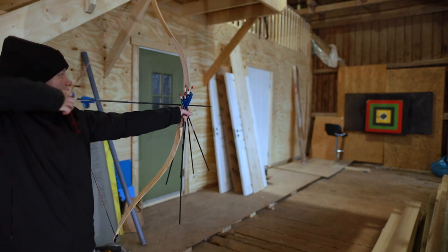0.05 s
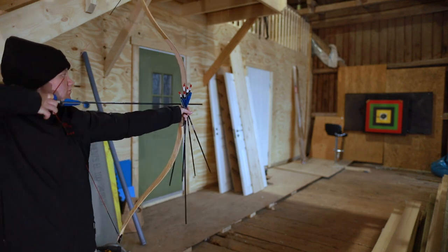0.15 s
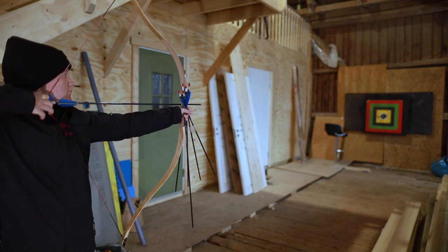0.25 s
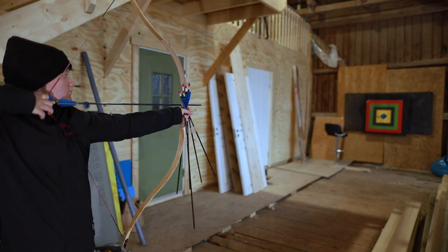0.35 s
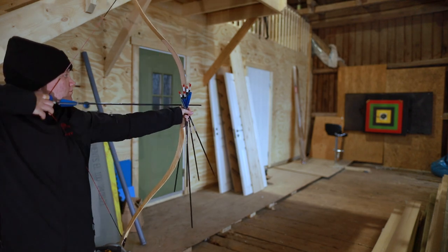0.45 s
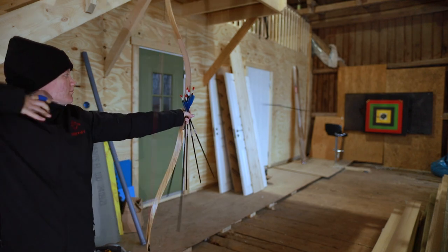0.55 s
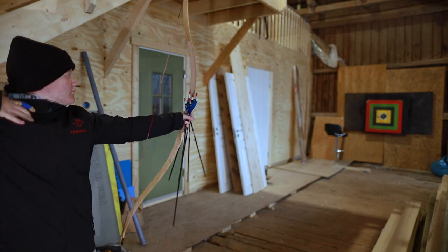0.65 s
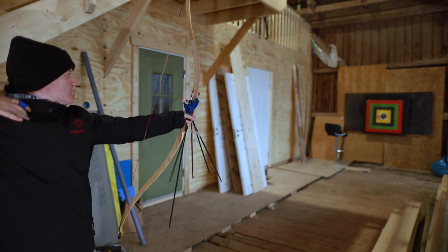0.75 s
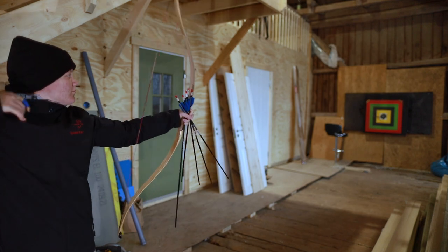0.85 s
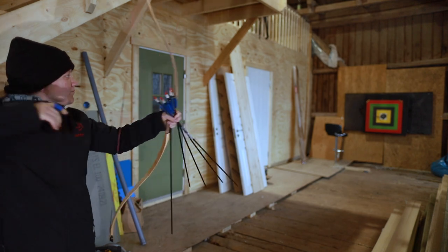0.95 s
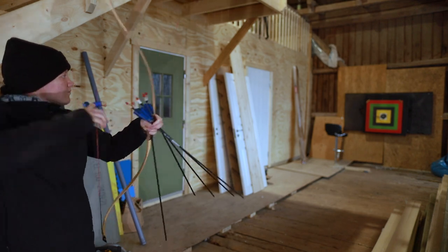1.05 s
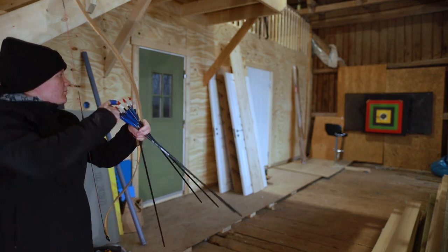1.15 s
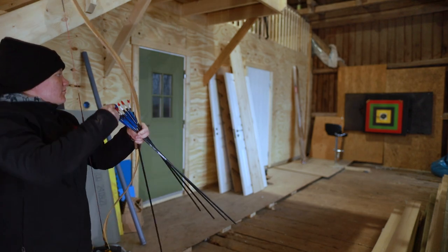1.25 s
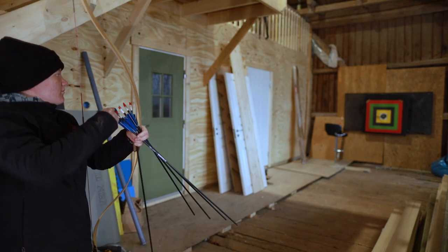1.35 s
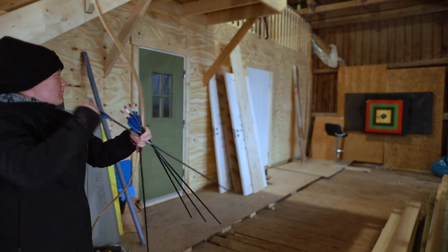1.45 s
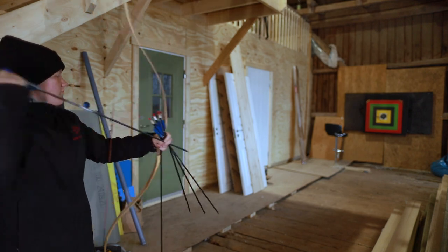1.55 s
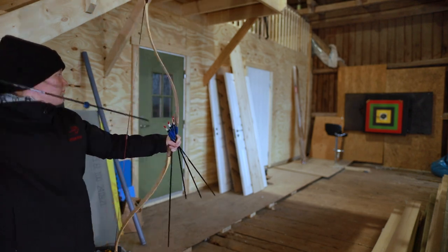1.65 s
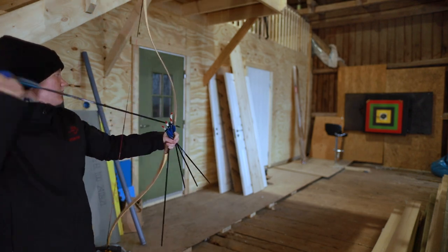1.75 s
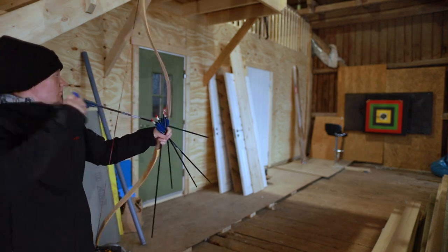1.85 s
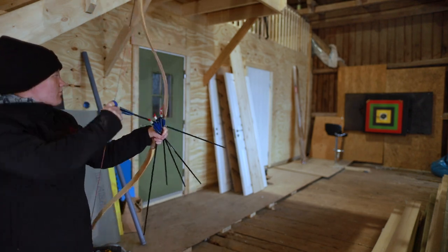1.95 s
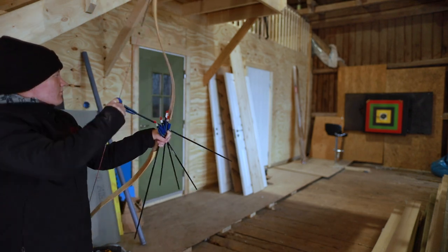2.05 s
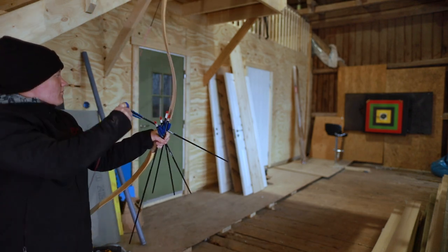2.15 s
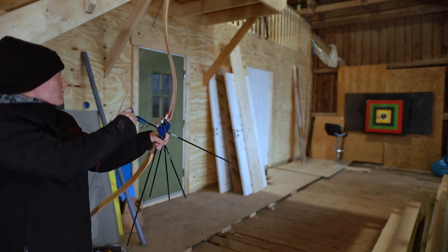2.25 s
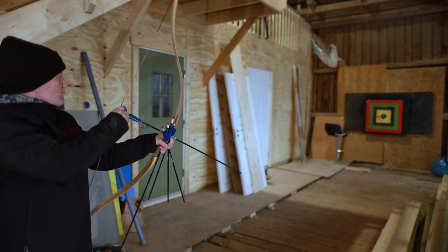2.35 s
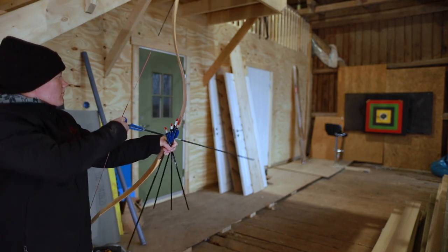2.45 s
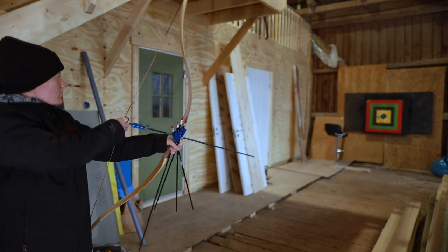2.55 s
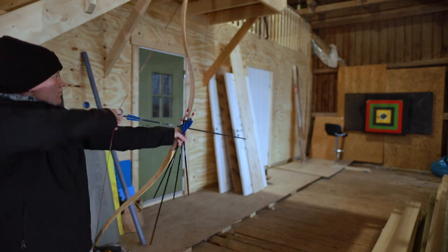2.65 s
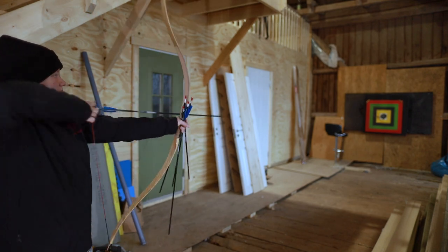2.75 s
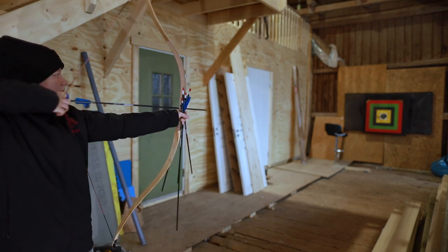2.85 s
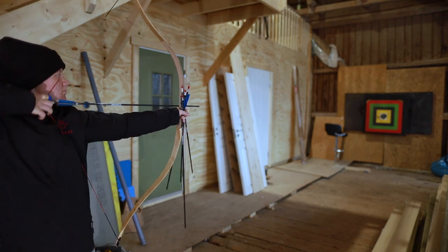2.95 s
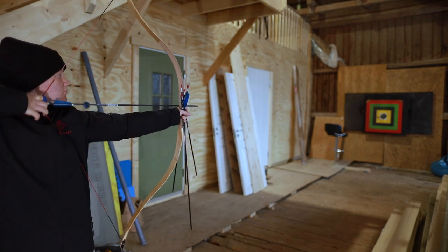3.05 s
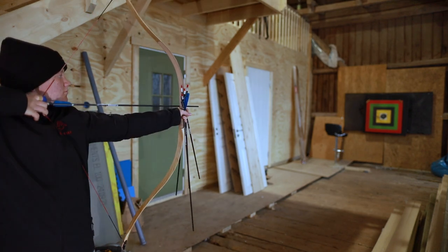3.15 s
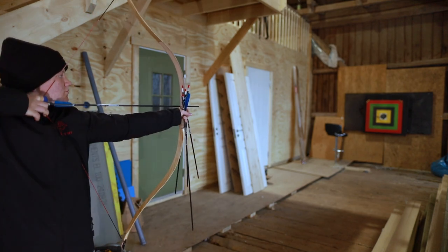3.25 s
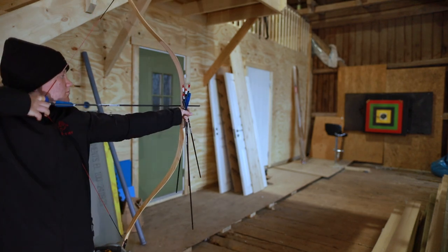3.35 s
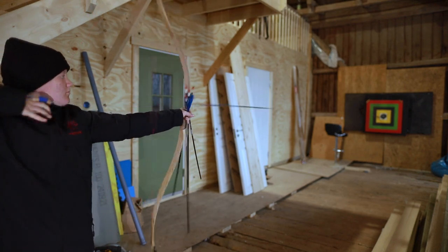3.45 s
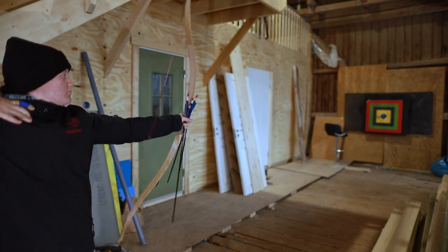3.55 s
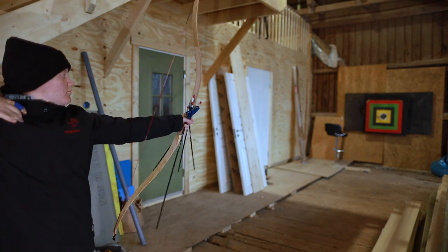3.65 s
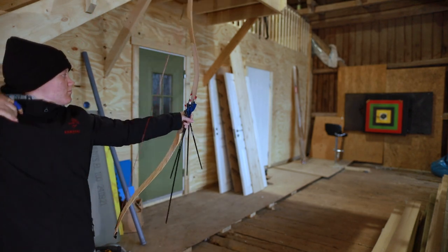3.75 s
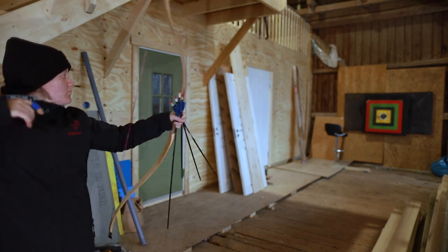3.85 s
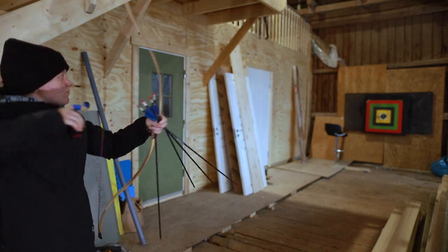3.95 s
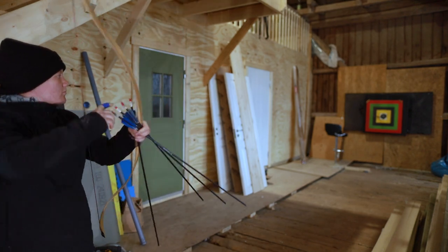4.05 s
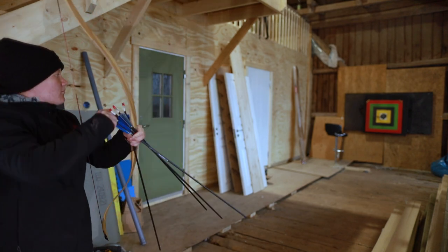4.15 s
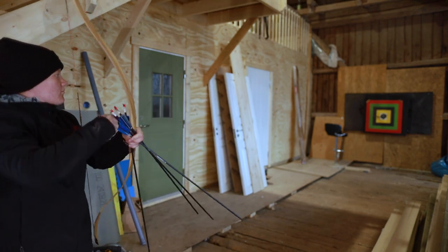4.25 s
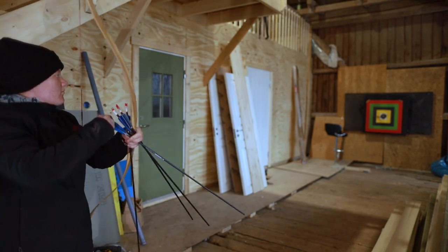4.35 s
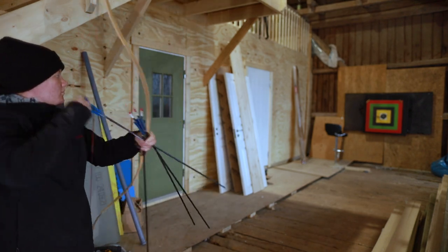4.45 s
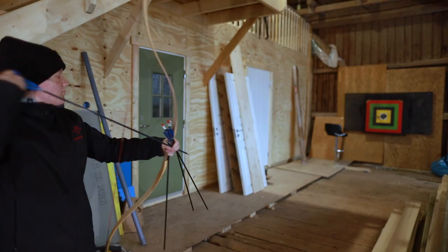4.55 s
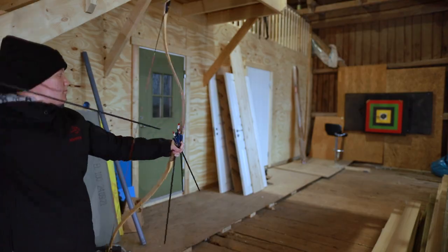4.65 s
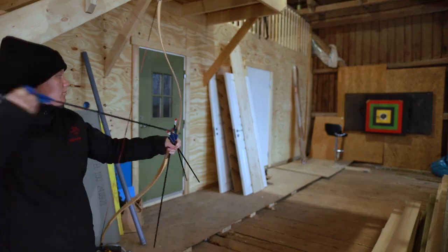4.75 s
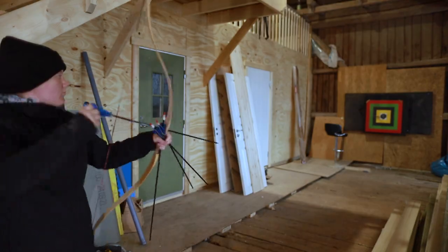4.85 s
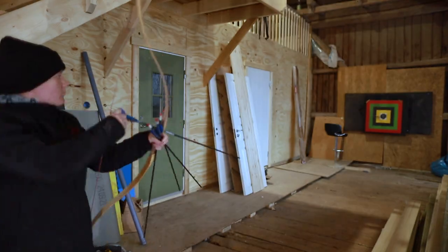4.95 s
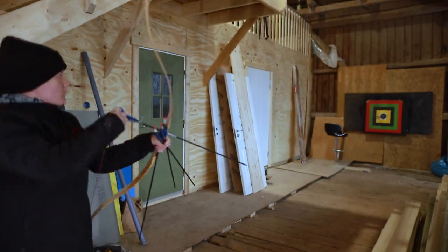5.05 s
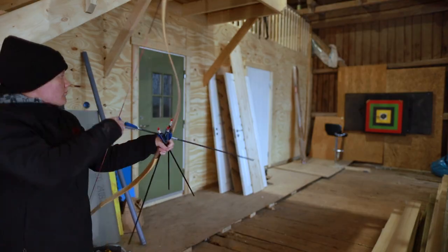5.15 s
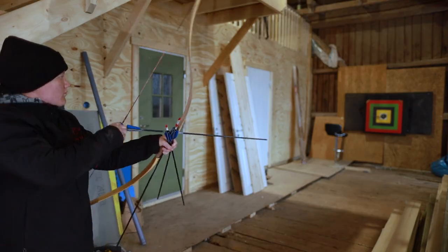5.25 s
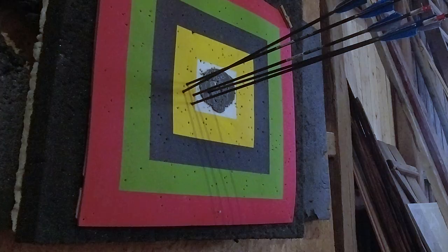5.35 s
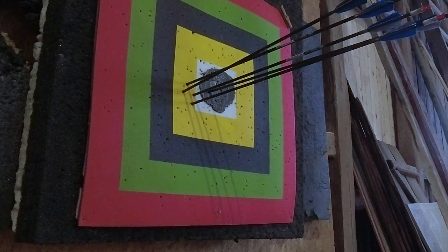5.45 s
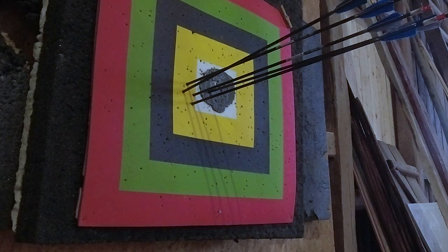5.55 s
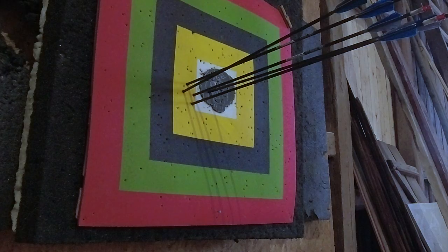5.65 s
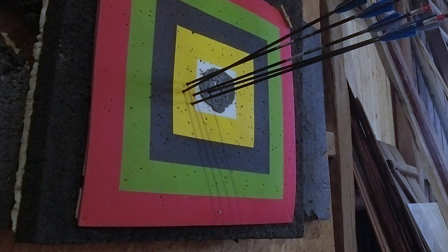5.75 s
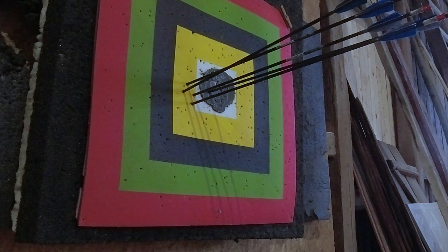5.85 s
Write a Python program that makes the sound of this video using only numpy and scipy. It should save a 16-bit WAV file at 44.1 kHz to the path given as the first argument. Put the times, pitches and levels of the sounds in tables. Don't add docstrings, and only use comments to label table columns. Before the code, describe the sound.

An archer looses an arrow, it cracks into a foam target and the barn rings; quiet reloading clicks, then a second shot.

```python
import sys
import numpy as np
from scipy import signal
from scipy.fft import rfft, irfft
from scipy.io import wavfile

SR = 44100
rng = np.random.default_rng(int(sys.argv[2]) if len(sys.argv) > 2 else 0)


def undo_db(level):
    steps = np.asarray(level, float) / 20
    return 10 ** steps


def unload_wav(signal):
    wavfile.write(
        sys.argv[1],
        SR,
        np.round(np.clip(np.atleast_2d(signal).T, -1, 1) * 32767).astype(np.int16),
    )


N = 260190

# time in seconds, peak in dB, backing-board hum in dB.
HITS = [
    (.7908, -.5, -85),
    (3.7108, -.5, -50),
]
# frequency in Hz, density in dB per Hz.
FOLD_COLOUR = [(47, -61.5), (80, -20), (479, -2.5), (555, -6), (853, -2.5), (1500, -7), (1950, -30),
               (3300, -120)]
# frequency in Hz, density in dB per Hz.
SCUFF_COLOUR = [(880, -27), (1500, -11), (2080, -8.5), (3050, -3), (4200, -1.5), (5000, -16), (6500, -40),
                (11000, -120)]


def rms_one(x):
    return x / np.sqrt(np.mean(x ** 2) + 1e-20)


def peak_one(x):
    return x / (np.max(np.abs(x)) + 1e-20)


def at_hz(points, hz, column=1):
    points = np.array(points)
    return np.interp(np.log(hz), np.log(points[:, 0]), points[:, column])


def add(out, s, piece):
    i = max(round(s * SR), 0)
    out[i:i + len(piece)] += piece[:N - i]


def resonance(x, hz, width_hz):
    r = np.exp(-np.pi * width_hz / SR)
    zeros = np.array([1, 0, -1]) * (1 - r * r) / 2
    return signal.lfilter(zeros, [1, -2 * r * np.cos(2 * np.pi * hz / SR), r * r], x)


def ring(clicks, hz, t60):
    r, w = undo_db(-60 / (t60 * SR)), 2 * np.pi * hz / SR
    return signal.lfilter([0, np.sin(w)], [1, -2 * r * np.cos(w), r * r], clicks + 1e-18)


def band(x, low_hz, high_hz):
    edges = [low_hz, min(high_hz, .45 * SR)]
    return signal.sosfilt(signal.butter(2, edges, "band", fs=SR, output="sos"), x)


def drift(rate_hz):
    r = np.exp(-2 * np.pi * rate_hz / SR)
    return rms_one(signal.lfilter([1], [1, -2 * r, r * r], rng.standard_normal(N + SR))[SR:])


def coloured(spectrum, grain_db, size=N):
    grains = rng.standard_normal(size) * undo_db(grain_db * np.minimum(rng.exponential(1, size), 5))
    hz = np.fft.rfftfreq(size, 1 / SR) + 1
    return rms_one(irfft(rfft(grains) * undo_db(at_hz(spectrum, hz)), size))


def knocks(rows, ring_width_hz, port_db, broad_db, grit):
    out, t = np.zeros(N), np.arange(2048) / SR
    roughness = rng.standard_normal((len(rows), 2048))
    for (s, db, hz, body_db, snap_db, contact_s), noise in zip(rows, roughness):
        burst = grit * noise * np.exp(-t / np.clip(contact_s, 2e-4, .02))
        burst[0] = -1
        port = resonance(burst, 3750, 750)
        shaft = resonance(burst, hz, ring_width_hz) + undo_db(port_db) * port
        shaft = band(shaft + undo_db(broad_db) * burst, 1200, 4600)
        body = band(band(burst, 550, 1700), 400, 3000)
        top_hz = np.interp(snap_db - db, [-16, -4], [7000, 16000])
        snap = band(burst * np.exp(-t / 0.0018), 3200, top_hz)
        piece = undo_db(db) * peak_one(shaft) + undo_db(body_db) * peak_one(body) + undo_db(snap_db) * peak_one(snap)
        add(out, s - .0001, piece)
    return out


def bowstring():
    # thump time in seconds, swish in dB, thump in dB, thump in Hz, flutter in dB.
    releases = [
        (0.6081, -31, -23, 516.4, -26.5),
        (3.531, -31, -15.5, 538, -25),
    ]
    # frequency in Hz, density in dB per Hz.
    swish_colour = [(88, -50), (170, -28), (439, -2), (900, -7.5), (2650, 0), (4320, -2), (5790, -5.5),
                    (16000, -18.5)]
    # time in seconds, peak in dB, ring in Hz, body and snap in dB over peak.
    slaps = [(0.6067, -22.5, 3370, 0, 0), (0.6162, -2.5, 3780, -22.5, -9), (.6188, -5.5, 2860, -25, -15),
             (0.7799, -32, 2880, -9, -3), (3.5329, -13.5, 3360, -1.5, -6), (3.5296, -14, 3300, -6, -8),
             (3.538, -3.5, 3400, -18.5, -8.5), (3.5392, -10.5, 2200, -12, -20), (.6235, -16, 1599, -8, -14),
             (3.5439, -6, 3410, -24, -9.5), (3.698, -31.5, 3840, -21, 6), (3.7356, -23, 2170, -1.5, -19.5),
             (3.7755, -21, 2155, -9, -8)]
    # time in seconds, peak in dB, ring in Hz.
    rattle = [(0.628, -23, 3910), (.635, -18.5, 2269), (.646, -24.5, 2200), (0.629, -19.5, 2900),
              (.64, -24, 3286), (0.6596, -20.5, 3472), (0.6653, -26, 3560), (0.6697, -29.5, 4240),
              (0.6992, -30, 3177), (3.545, -12, 2200), (3.5565, -18, 3840), (3.558, -19, 2150),
              (3.5655, -23, 1700), (3.632, -28.5, 4200), (3.5814, -20, 2804), (3.5876, -22, 2730),
              (3.5929, -20.5, 4220)]
    out, t = np.zeros(N), np.arange(SR // 2) / SR
    since = t - .05
    for s, swish_db, thump_db, thump_hz, flutter_db in releases:
        air = coloured(swish_colour, 1.7, size=len(t))
        swish = undo_db(swish_db) * np.exp(np.minimum(since / 0.0053, -since / 0.0014))
        limb_swing = 2.5 * np.cos(2 * np.pi * 20.8 * (since - .01))
        flutter = undo_db(flutter_db + limb_swing - 60 * (since - .008) / 0.31) * (since > .008)
        push = np.gradient(np.exp(-(since / .0003) ** 2))
        thump = undo_db(thump_db) * peak_one(ring(push, thump_hz, 0.0084))
        add(out, s - .05, air * swish + band(air, 200, 9000) * flutter + thump)
    rows = [(s, db, hz, db + body_db, db + snap_db, 0.00086) for s, db, hz, body_db, snap_db in slaps]
    rows += [(s, db, hz, db - 11, db - 5, .003) for s, db, hz in rattle]
    return out + knocks(rows, ring_width_hz=240, port_db=-8.0, broad_db=-14.5, grit=0.16)


def pips():
    # time in seconds, peak in dB.
    pops = [(.604, -36), (.6075, -30), (.625, -28), (.629, -28), (.648, -32), (.66, -29.5), (.692, -40),
            (1.738, -49.5), (1.36, -46), (2.662, -50), (3.388, -50), (3.526, -30), (3.5311, -21.5),
            (3.5437, -24), (3.5653, -36.5), (3.583, -25.5), (3.6144, -37.5), (4.909, -42.5), (5.017, -52)]
    out, t = np.zeros(N), np.arange(512) / SR
    for (s, db), noise in zip(pops, rng.standard_normal((len(pops), 512))):
        burst = band(noise * np.exp(-t / 0.00098), 6000, 16000)
        add(out, s - .0005, undo_db(db) * peak_one(band(burst, 6000, 18000)))
    return out


def target():
    # frequency in Hz, level in dB, t60 in seconds.
    foam_modes = [(170, -26, 0.13), (340, -28.5, .04), (750, -14.5, 0.022), (1605, 6.5, 0.008),
                  (1800, -5.5, 0.016), (2200, -2.5, 0.012), (3800, -7, .004), (5300, -8, .003),
                  (8100, -17.5, 0.0015), (11994, -19.5, 0.0029)]
    blows, hum, t = np.zeros(N), np.zeros(N), np.arange(4096) / SR
    for s, db, hum_db in HITS:
        crunch = 0.027 * rng.standard_normal(len(t)) * np.exp(-t / 0.007)
        crunch[0] = -1
        blow = np.zeros(len(t))
        for hz, level_db, t60 in foam_modes:
            blow += undo_db(level_db + 2 * rng.standard_normal()) * ring(crunch, hz, t60)
        add(blows, s, undo_db(db) * peak_one(band(blow, 260, 16000)))
        add(hum, s + 0.0096, [undo_db(hum_db)])
    floor_bounce = undo_db(-3) * np.roll(blows, round(.0014 * SR))
    return blows + floor_bounce + ring(hum, 136, .85)


def taps():
    # time in seconds, peak in dB, ring in Hz, snap in dB over peak.
    wood_taps = [(0.0138, -41, 3800, -18), (0.0367, -46, 3970, -7), (0.0852, -34.5, 2050, -25),
                 (0.124, -41, 4030, 5.5), (.1458, -52, 3800, -8), (1.136, -42, 3050, -4),
                 (1.225, -43.5, 2580, 5.5), (1.482, -50, 2280, -11), (1.789, -56.5, 3120, 10),
                 (1.8924, -34, 2036, -8), (1.915, -37.5, 2050, -1), (2.2572, -40, 2520, -5),
                 (2.3593, -50, 2370, -11), (2.481, -46, 3600, -4), (2.8415, -52, 3890, 2),
                 (2.9327, -43, 1343, -11), (4.044, -56.5, 2010, 10.5), (4.0895, -52, 3850, 5.5),
                 (4.358, -50.5, 3136, 15), (4.789, -44, 3720, 3), (4.877, -39.5, 1500, -6),
                 (4.93, -50, 1300, -15), (5.018, -37, 1940, -15), (2.569, -36, 1500, -23),
                 (4.945, -30.5, 2050, -31), (4.686, -40, 1500, -14), (5.1531, -36.5, 3300, -2),
                 (2.449, -48, 1250, -15), (5.319, -48.5, 1258, -13), (1.655, -45, 1250, -15),
                 (5.4255, -48.5, 3800, -10.5)]
    # time in seconds, peak in dB, ring in Hz, snap in dB over peak, contact in seconds.
    clicks = [(1.258, -39.5, 3700, 8, 0.0017), (1.3654, -36.5, 4260, -1, 0.0003),
              (5.1435, -37.5, 1600, 1, 0.0055), (1.3827, -44.5, 1290, -3, 0.0025),
              (1.391, -45, 1300, -12, 0.0026), (1.4048, -37, 4040, 3, 0.00049),
              (1.6884, -26.5, 2370, -19, 0.0032), (1.7458, -14, 3900, 8, 0.00082),
              (1.7532, -29.5, 2900, 2, 0.0012), (1.881, -23, 3800, -34, 0.0016),
              (2.251, -40, 2420, -0.5, 0.013), (2.4159, -26.5, 3300, -3.5, 0.0023),
              (2.4205, -33, 2750, -4, 0.00095), (2.57, -19.5, 3400, -21, 0.0015),
              (3.1032, -43, 3814, 10, .0006), (4.329, -37.5, 2480, 1, 0.001),
              (4.678, -27, 3700, -20, 0.0017), (4.6829, -29.5, 3160, 4.5, 0.0017),
              (4.6888, -18.5, 3460, -20, 0.0005), (4.694, -28, 3600, -18, 0.0013),
              (4.7354, -27.5, 3760, 17, 0.0031), (4.7403, -31.5, 3300, 5.5, 0.0076),
              (4.9449, -13.5, 3800, -14, 0.0024), (4.9515, -15, 2900, -20.5, 0.0023),
              (5.133, -31.5, 3200, 9, 0.014)]
    # time in seconds, peak in dB, snap in dB over peak.
    faint_ticks = [(0.274, -53.5, -1), (.382, -49.5, -1), (0.4055, -52, -23), (.413, -58, 11.5),
                   (0.4247, -49.5, -9.5), (0.5748, -53.5, 0), (1.3058, -46, -13), (1.319, -48, -7),
                   (1.3545, -49.5, 14.5), (1.372, -40.5, 10.5), (2.662, -61, 17), (2.7809, -47, 11.5),
                   (3.2244, -55, 3.5), (3.3025, -59.5, -15.5), (4.1666, -48.5, 7.5), (4.1857, -44, 7),
                   (4.214, -49.5, 11.5), (4.726, -40, -3), (4.8984, -44, 5.5)]
    rows = [(s, db, hz, db - 6, db + snap_db, 0.0018) for s, db, hz, snap_db in wood_taps]
    rows += [(s, db, hz, db - 29, db + snap_db, contact_s) for s, db, hz, snap_db, contact_s in clicks]
    ticks = [(s, db, 3900, db - 23.5, db + snap_db, 0.0011) for s, db, snap_db in faint_ticks]
    touches = knocks(rows, ring_width_hz=600, port_db=-7, broad_db=-11, grit=.3)
    return touches + knocks(ticks, ring_width_hz=500, port_db=-7, broad_db=-22, grit=0.35)


def shaft_rings():
    # frequency in Hz, level in dB, t60 in seconds.
    shaft_modes = [(969, -5, 0.046), (1650, -7.5, 0.036), (2050, 0, 0.024), (2560, -4, 0.024),
                   (3087, -1, 0.024), (3430, -34, 0.019), (3790, -2, 0.027), (4330, -31, .016),
                   (4960, -6, 0.02)]
    # time in seconds, level in dB, best struck mode in Hz, reach in octaves.
    touches = [(.0852, -43.5, 2050, 0.27), (1.6884, -36, 1710, 0.74), (1.7458, -23.5, 3790, 0.44),
               (1.752, -41, 1800, 0.31), (1.881, -28.5, 2800, 0.64), (1.8921, -53, 2050, .6),
               (2.4159, -37.5, 3050, 0.44), (2.5696, -31.5, 3020, 0.55), (4.679, -40, 2500, 0.66),
               (4.6885, -35, 3460, .5), (4.9449, -20.5, 2800, 0.54), (4.9519, -29, 2580, 0.45),
               (5.018, -44, 1650, 0.51), (5.133, -42, 3100, 0.33)]
    out, click = np.zeros(N), np.r_[-1., np.zeros(2047)]
    for s, db, best_hz, octaves in touches:
        for hz, level_db, t60 in shaft_modes:
            off_best_db = 7.8 * (np.log2(hz / best_hz) / octaves) ** 2
            mode_db = db + level_db + 1.2 * rng.standard_normal() - off_best_db
            add(out, s, undo_db(mode_db) * ring(click, hz, t60))
    return band(band(out, 700, 16000), 500, 18000)


def slides():
    # time in seconds, level in dB.
    drags = [
        [(2.478, -65), (2.484, -48), (2.508, -45), (2.522, -48), (2.545, -47), (2.562, -44), (2.575, -49),
         (2.63, -62), (2.68, -69.5)],
        [(5.22, -74.5), (5.24, -66.5), (5.285, -66.5), (5.34, -52.5), (5.36, -76)],
    ]
    # start in seconds, length in seconds, from Hz, to Hz, level in dB.
    squeaks = [(2.485, .035, 2700, 2900, -48), (2.49, .03, 2000, 2100, -55), (2.498, .022, 1450, 1550, -53),
               (2.488, .035, 3700, 3900, -53), (2.518, .032, 2300, 2950, -50),
               (2.522, .022, 3500, 3800, -51), (2.538, .028, 2950, 3800, -42),
               (2.532, .034, 4300, 5700, -60), (2.535, .03, 1200, 1700, -58), (2.55, .018, 2100, 2500, -56),
               (2.60, .06, 3100, 3700, -59), (2.605, .03, 2600, 2750, -60), (5.175, .04, 1950, 2050, -67),
               (5.236, .035, 1650, 2400, -63), (5.228, .025, 3150, 3300, -62),
               (5.266, .04, 2680, 2760, -61), (5.268, .045, 3150, 3200, -62),
               (5.314, .018, 3130, 3160, -62), (5.27, .024, 800, 960, -61), (4.8, .05, 800, 3000, -68)]
    out = np.zeros(N)
    for rows in drags:
        s, level_db = np.transpose(rows)
        t = np.arange(s[0], s[0] + 0.23, 1 / SR)
        grip = np.repeat(rng.standard_normal(len(t) // 80 + 1), 80)[:len(t)]
        friction = undo_db(np.interp(t, s, level_db, right=-120) + 2.2 * grip) * rng.standard_normal(len(t))
        add(out, s[0], band(friction, 1060, 5400) + undo_db(-13.0) * band(friction, 4500, 8400))
    smooth = signal.butter(2, 150, fs=SR, output="sos")
    for s, length, from_hz, to_hz, db in squeaks:
        share = np.arange(round(np.clip(length, .008, .08) * SR)) / (length * SR)
        sway = rms_one(signal.sosfilt(smooth, rng.standard_normal((2, 4096))))[:, -len(share):]
        turn = np.exp(2j * np.pi * np.cumsum(from_hz + (to_hz - from_hz) * share) / SR)
        note = np.real((1.12 + sway[0] + 1j * sway[1]) * turn)
        add(out, s, undo_db(db) * np.sqrt(np.abs(np.sin(np.pi * share))) * note)
    return out


def creaks():
    # time in seconds, peak in dB.
    limb_slips = [(2.136, -65.5), (2.184, -71.5), (2.205, -69), (2.23, -67), (2.283, -66), (2.315, -73),
                  (2.338, -69), (2.368, -72), (2.39, -69), (3.105, -64.5), (3.166, -65), (3.176, -68),
                  (3.221, -69), (3.241, -66), (3.341, -70.5), (3.357, -68.5), (5.541, -64), (5.611, -66.5),
                  (5.636, -67), (5.674, -65.5), (5.689, -65.5), (5.71, -63), (5.741, -56), (5.776, -68),
                  (5.829, -70)]
    # frequency in Hz, level in dB, t60 in seconds.
    limb_modes = [(560, -4, .03), (800, 4, .03), (880, 10, 0.04), (940, 7, 0.03), (1050, -1, .025),
                  (1800, -10, 0.03)]
    slips, t = np.zeros(N), np.arange(800) / SR
    for s, db in limb_slips:
        slip = 0.022 * rng.standard_normal(800) * np.exp(-t / 0.0094)
        slip[:14] += np.hanning(14) / 6
        add(slips, s, undo_db(db - 9.0) * slip)
    return sum(undo_db(db) * ring(slips, hz, t60) for hz, db, t60 in limb_modes)


def jacket():
    # time of full speed in seconds, sleeve scuff in dB,
    # swell and fade by 20 dB in seconds, coat folds in dB over scuff.
    gestures = [(.08, -67, 2, 0.38, -5), (.95, -66.5, -0.11, 0.18, -7), (1.14, -70, -0.18, 0.12, -4.5),
                (1.25, -63, 0.01, 0.22, -21), (1.37, -68, 0.07, 0.23, -12.5), (1.602, -56, 0.14, 0.25, -18),
                (1.791, -61, 0.07, 0.09, -11.5), (1.98, -64.5, 0.13, 0.12, -8),
                (2.1, -70.5, 0.03, 0.03, -9), (2.329, -70, 0.2, -0.14, -2.5),
                (2.461, -62, 0.07, -0.0555, -4), (2.82, -65, 0.31, 0.25, -5.5),
                (3.1, -75, -0.45, 0.42, -5.5), (3.87, -70, 0.03, 0.24, -8), (4.2, -68, -0.11, 0.16, -9),
                (4.36, -65.5, -0.03, 0.12, -14), (4.601, -56, 0.155, 0.16, -22),
                (4.768, -61, 0.06, 0.08, -5), (4.92, -63.5, 0.18, 0.13, -6),
                (5.05, -72.5, -0.08, 0.19, -12), (5.199, -64, 0.23, 0.19, -10.5), (5.46, -72, 0, 0.18, -2),
                (5.78, -74, 0.65, 4, -1.5)]
    # frequency in Hz, density in dB per Hz.
    nylon_colour = [(2940, -39.5), (5000, -1), (6960, -1), (10900, -4.5), (13800, 1), (16000, -7.5)]
    even_db = -64
    t, folding, scuffing, hissing = np.arange(0, N + 64, 64) / SR, 0, 0, 0
    for s, db, swell, fade, folds_db in gestures:
        away = np.abs((t - s) / np.where(t < s, swell, fade))
        speed = undo_db(db - 20 * away ** 3)
        folding = folding + undo_db(folds_db) * speed
        scuffing = scuffing + speed
        hissing = hissing + undo_db(0.24 * (db - even_db)) * speed
    folding, scuffing, hissing = [np.interp(np.arange(N) / SR, t, v) for v in (folding, scuffing, hissing)]
    shared = 1.5 * drift(30)
    folds = folding * undo_db(shared + 1.5 * drift(30)) * coloured(FOLD_COLOUR, 2.5)
    cloth, rub = coloured(SCUFF_COLOUR, 1.8), 0
    for k, low_hz in enumerate(800 * 1.5 ** np.arange(5)):
        rub = rub + undo_db(drift(9)) * band(cloth, low_hz, 1.5 * low_hz) * (-1) ** k
    crackle = rng.random(N) < 400 * undo_db(6 * drift(15)) / SR
    crackle = crackle * undo_db(6.1 * rng.standard_normal(N))
    scuff = scuffing * (undo_db(shared + 1.53 * drift(57)) * rms_one(rub) + 4 * band(crackle, 1000, 7000))
    nylon = hissing * undo_db(shared + 1.7 * drift(78)) * coloured(nylon_colour, 1.5)
    snaps = (rng.random(N) < 140 / SR) * np.sqrt(hissing) * undo_db(-19 + 4 * rng.standard_normal(N))
    whistle = rms_one(band(rng.standard_normal(N), 11500, 14000))
    sheen = undo_db(-23.5) * hissing ** 2 / undo_db(even_db) * whistle
    return folds + scuff + nylon + sheen + band(snaps, 5000, 16000)


def planks():
    # time in seconds, peak in dB, note in Hz.
    groans = [(1.767, -63, 305.4), (2.07, -68, 298.6), (2.363, -62, 319), (2.437, -63, 320),
              (4.352, -69.5, 214), (.64, -36, 445), (3.55, -36, 579.6), (5.426, -60.5, 376),
              (5.836, -64.5, 379)]
    out, push = np.zeros(N), np.zeros(SR // 4)
    push[:60] = np.hanning(60) / 30
    for s, db, hz in groans:
        add(out, s, undo_db(db) * ring(push, hz, 0.19))
    return out


def barn_wash():
    out, t = np.zeros(N), np.arange(SR // 2) / SR
    for s, *_ in HITS:
        shake = coloured(FOLD_COLOUR, 2.5, size=len(t))
        shake = shake + undo_db(-2.5) * coloured(SCUFF_COLOUR, 1.3, size=len(t))
        add(out, s, undo_db(-32 - 60 * t / 0.3) * np.minimum(t / .07, 1) * shake)
    return out


def wall_rumble():
    out, t = np.zeros(N), np.arange(SR) / SR
    for s, *_ in HITS:
        rumble = rms_one(band(rng.standard_normal(SR), 38, 115))
        add(out, s, undo_db(-60 - 60 * t / 0.9) * np.minimum(t / 0.008, 1) * rumble)
    return out


def thuds():
    # frequency in Hz, density in dB per Hz.
    thud_colours = [
        [(40, -42), (313, -11.5), (1100, -4), (2000, -7), (2600, -18), (3760, -7.5), (4900, -26), (16000, -36)],
        [(40, -47), (122, -19), (700, -9.5), (1500, -4), (2200, -5), (3180, -16.5), (5020, -26), (16000, -40)],
    ]
    thud_levels = [-1, -0.5]
    out, hz = np.zeros(N), np.fft.rfftfreq(2048, 1 / SR) + 1
    for (s, *_), spectrum, db in zip(HITS, thud_colours, thud_levels):
        cepstrum = irfft(np.log(undo_db(at_hz(spectrum, hz))))
        folded = cepstrum * np.r_[1, [2] * 1023, 1, [0] * 1023]
        pulse = irfft(np.exp(rfft(folded)))
        add(out, s, undo_db(db + 7) * pulse / np.sqrt(np.sum(pulse ** 2)))
    return out


def barn(x):
    # frequency in Hz, t60 in seconds, level in dB.
    barn_decay = [(70, 0.2, 0), (284, 0.51, 1), (600, 0.63, -2.5), (1500, 0.49, 3), (2800, 0.66, -6.5),
                  (4570, 0.3, 1), (8000, 0.41, -3.5), (16010, 0.24, -1.5)]
    t, tail = np.arange(SR) / SR, 0
    lumps_db = 5.2 * np.minimum(rng.exponential(1, SR), 4) * np.exp(-t / 0.032)
    white = rng.standard_normal((2, SR)) * undo_db(lumps_db)
    edges = 4600 * 2 ** (np.arange(-20, 8) / 3)
    for k, (low, high) in enumerate(zip(edges[:-1], edges[1:-1])):
        middle = np.sqrt(low * high)
        third = band(band(white[k % 2], low, high), low / 1.113, high * 1.1)
        tail = tail + third * undo_db(at_hz(barn_decay, middle, column=2) - 60 * t / at_hz(barn_decay, middle))
    tail = tail * np.clip((t - .002) / .004, 0, 1)
    return signal.fftconvolve(x, tail / np.sqrt(np.sum(tail ** 2)))[:N]


def room_air():
    # frequency in Hz, density in dB per Hz.
    air_colour = [(35, -39), (60, -8.5), (862, -1), (1700, -9.5), (3850, -0.5), (4640, -5), (13300, -5),
                  (16000, -17.5)]
    return undo_db(-80.5) * coloured(air_colour, .1)


def scene():
    string = band(bowstring(), 170, 19000) + pips()
    handling = taps() + slides() + shaft_rings()
    sent = thuds() + undo_db(-12.5) * string + undo_db(-14.5) * band(handling, 100, 6900)
    close = target() + string + handling + creaks() + jacket()
    building = planks() + barn_wash() + wall_rumble() + room_air() + barn(sent)
    return (close + building)[None]


def top_cut(x):
    return signal.sosfilt(signal.butter(12, 16980, fs=SR, output="sos"), x)


def record(dry):
    x = signal.sosfilt(signal.butter(2, 100, "high", fs=SR, output="sos"), dry)
    rounded = .9 * np.tanh(x / .9)
    mix = signal.sosfilt(signal.cheby2(14, 24, 16000, fs=SR, output="sos"), rounded)
    return top_cut(mix)


dry = scene()
out = record(dry)
unload_wav(out)
```